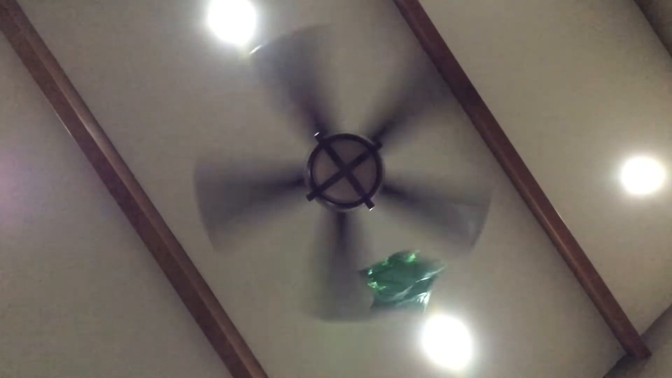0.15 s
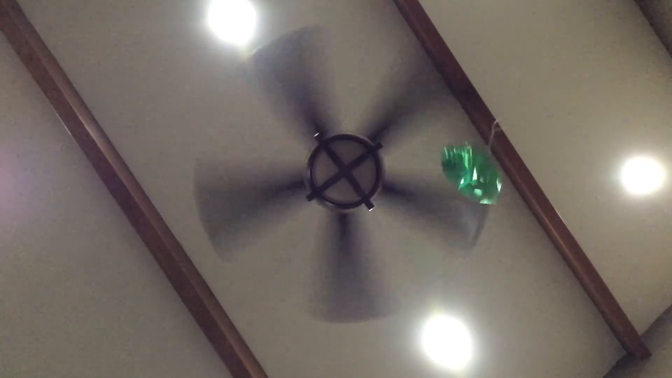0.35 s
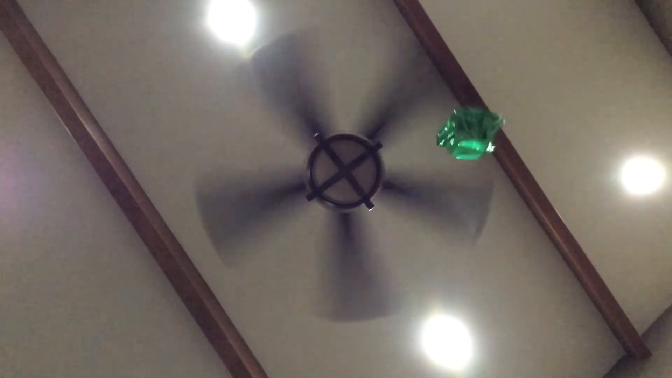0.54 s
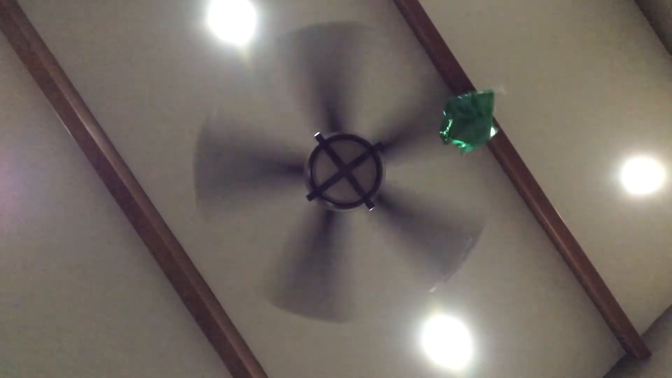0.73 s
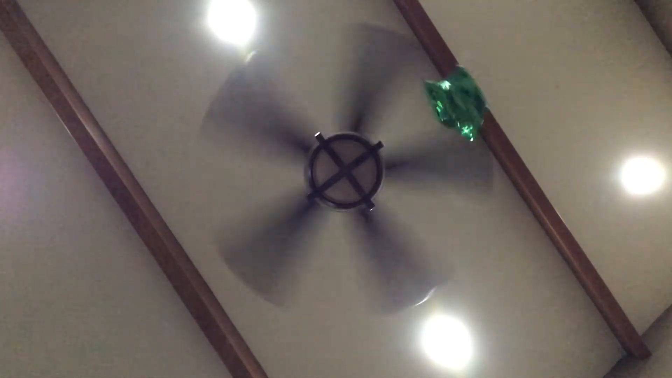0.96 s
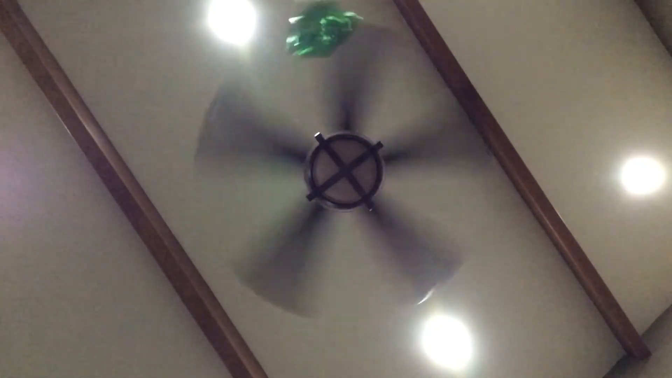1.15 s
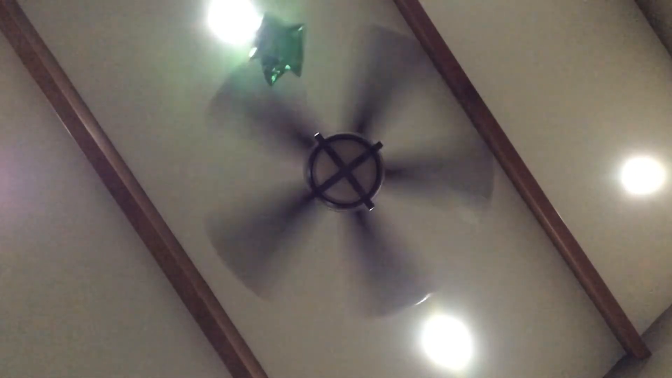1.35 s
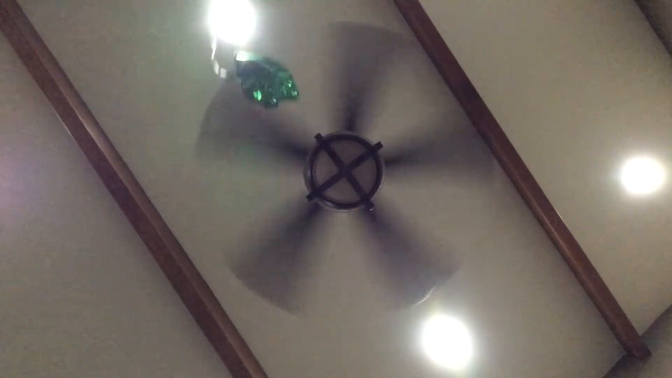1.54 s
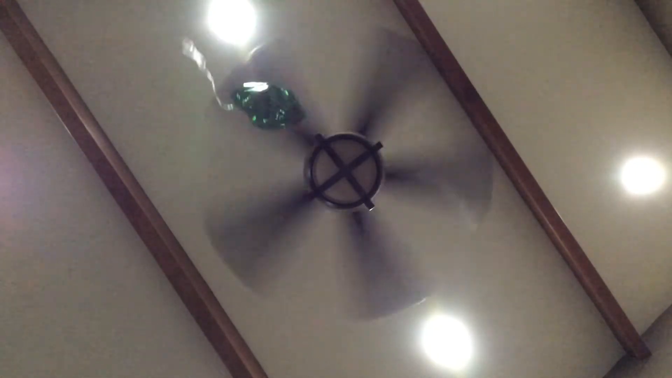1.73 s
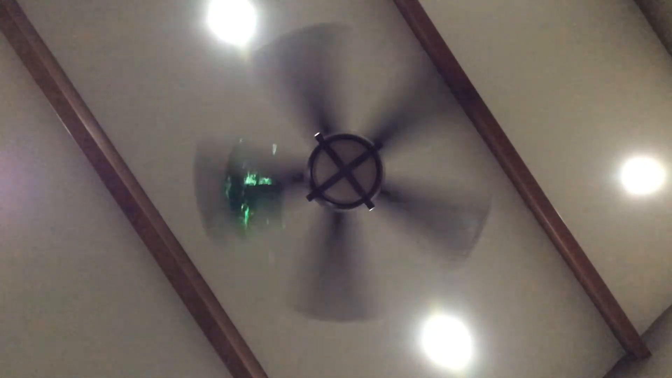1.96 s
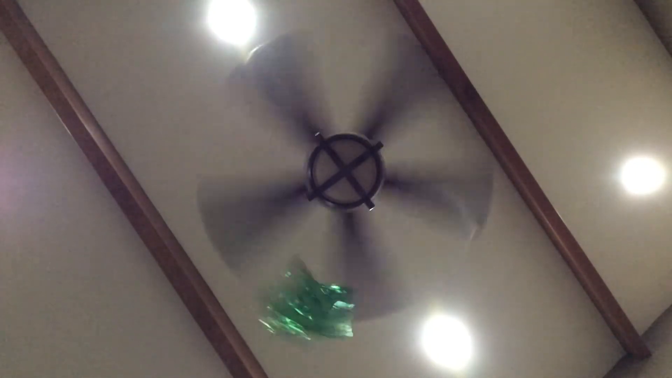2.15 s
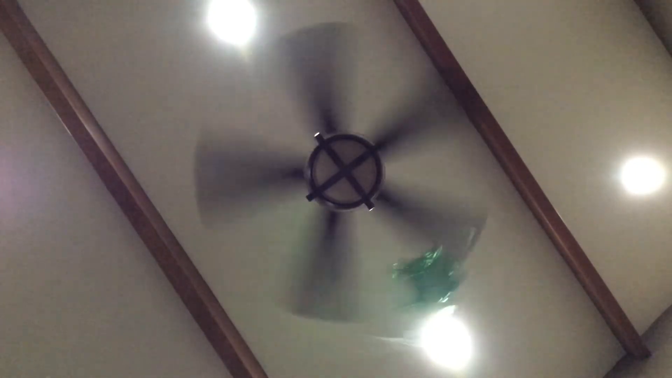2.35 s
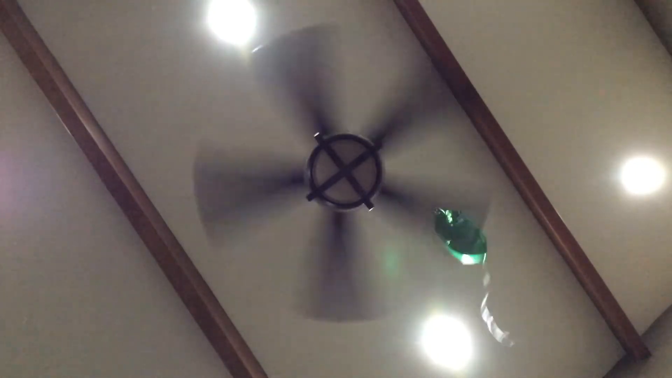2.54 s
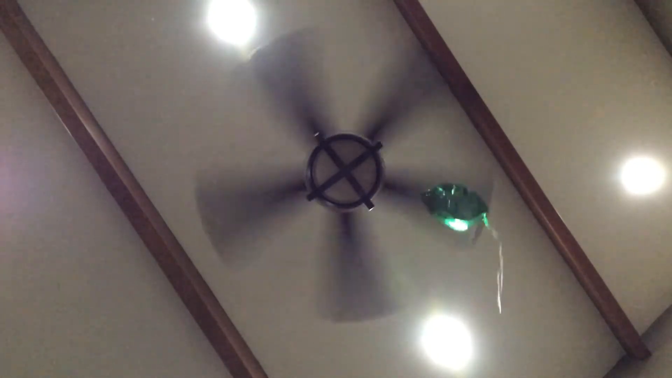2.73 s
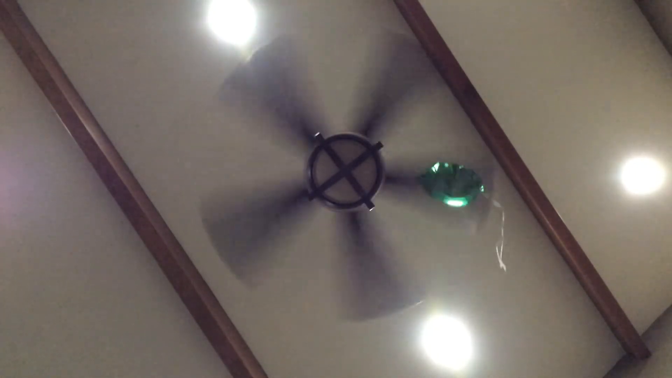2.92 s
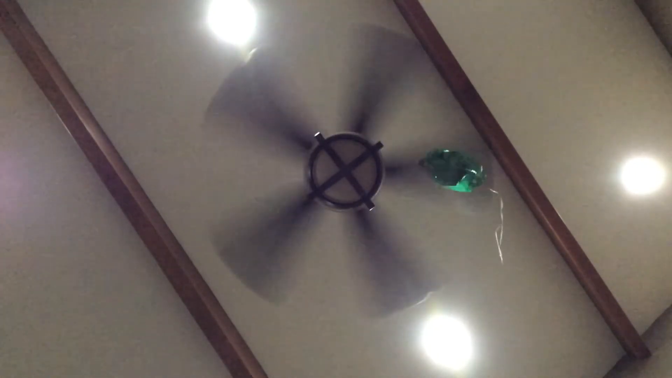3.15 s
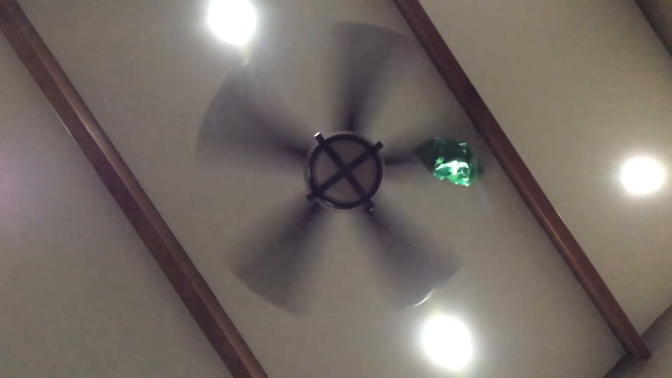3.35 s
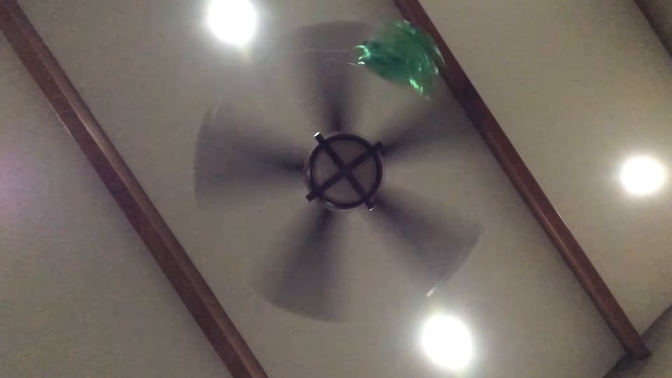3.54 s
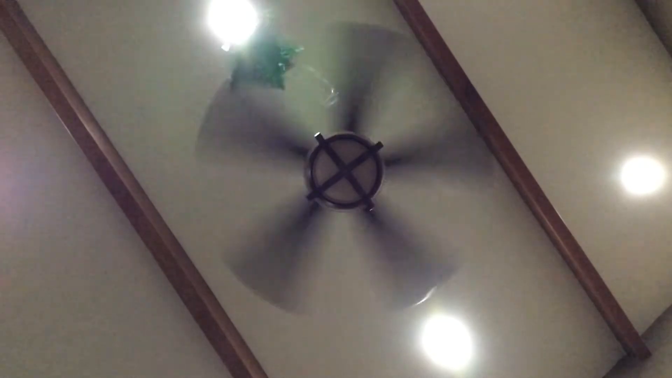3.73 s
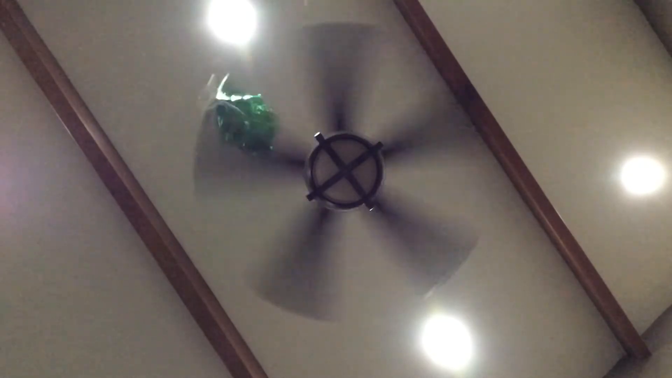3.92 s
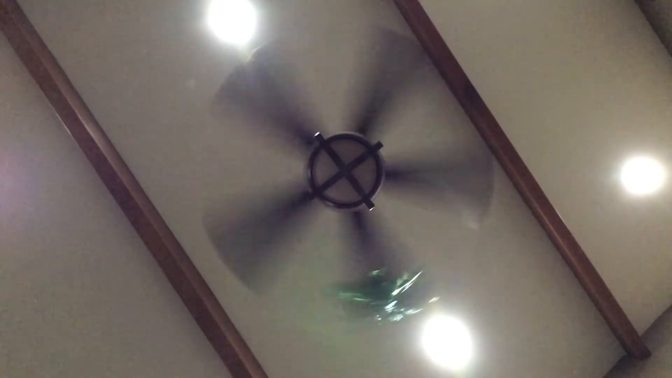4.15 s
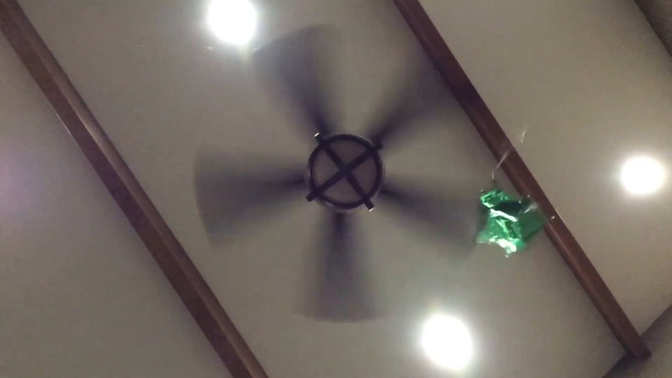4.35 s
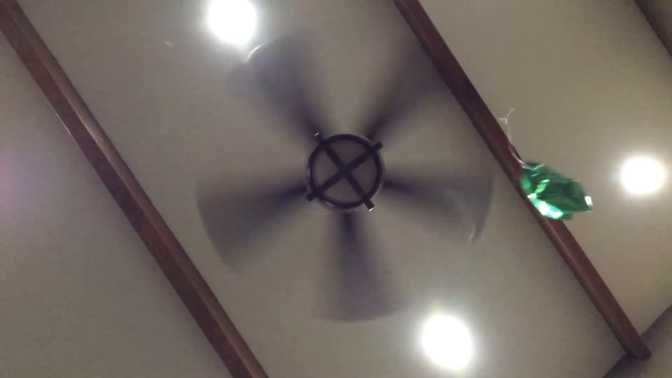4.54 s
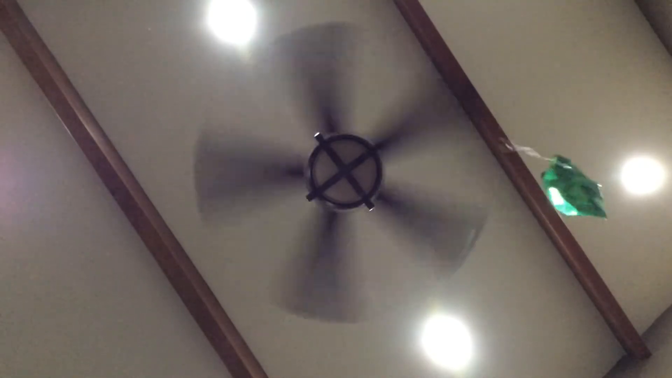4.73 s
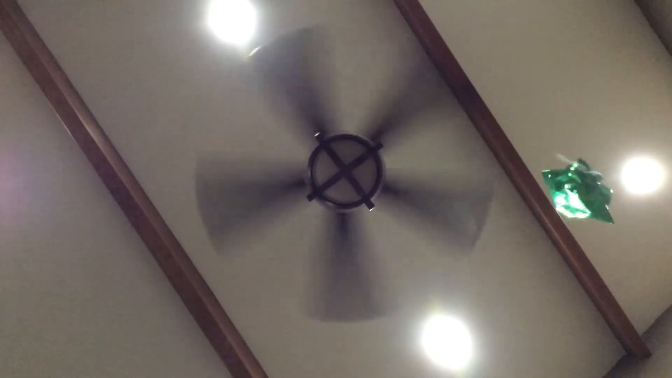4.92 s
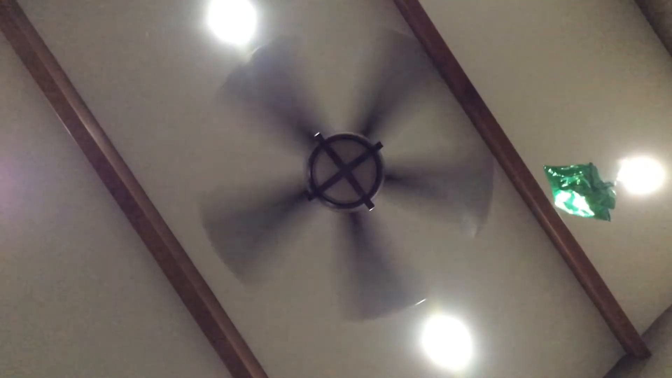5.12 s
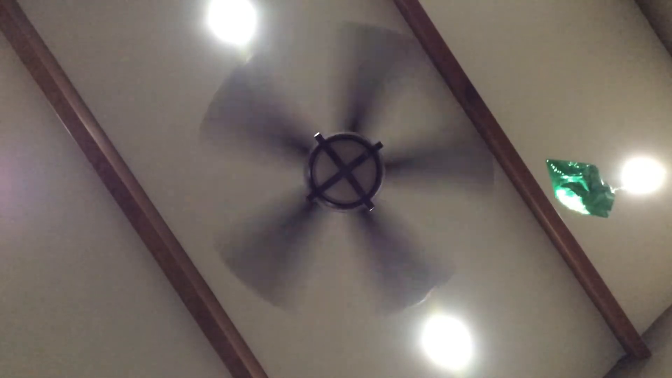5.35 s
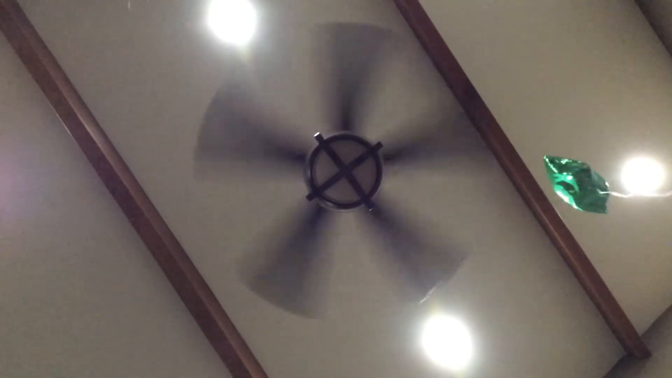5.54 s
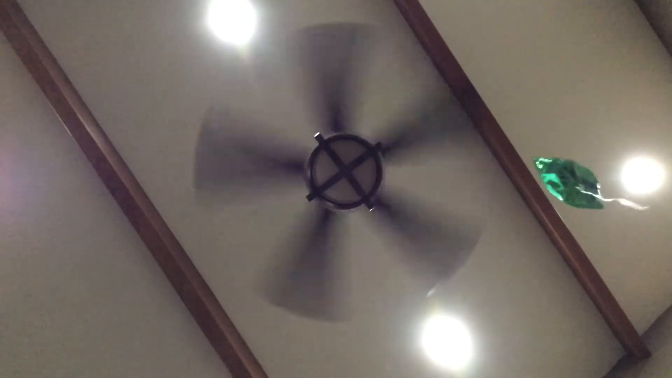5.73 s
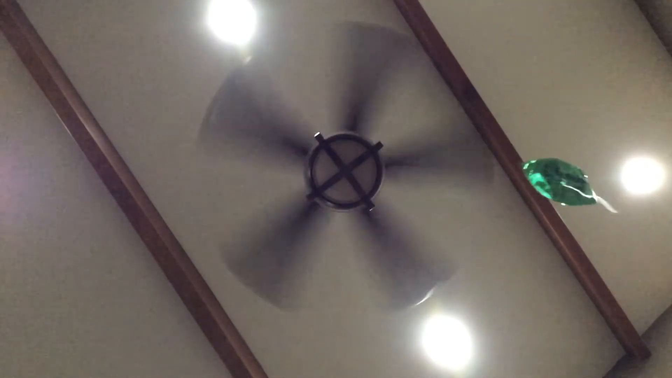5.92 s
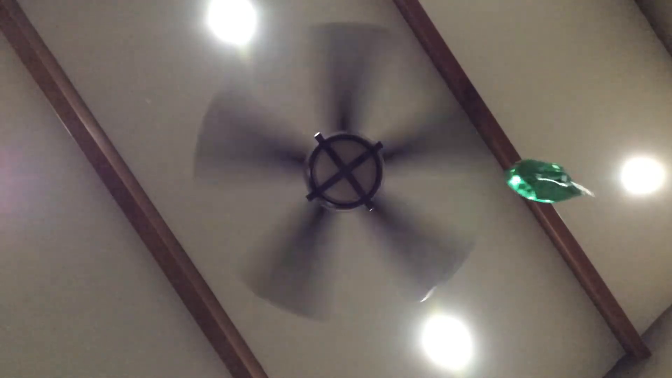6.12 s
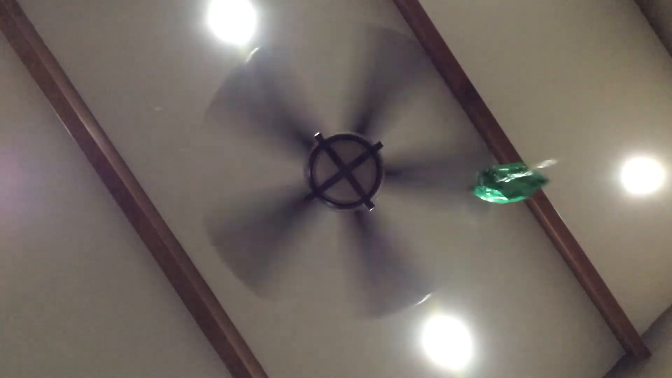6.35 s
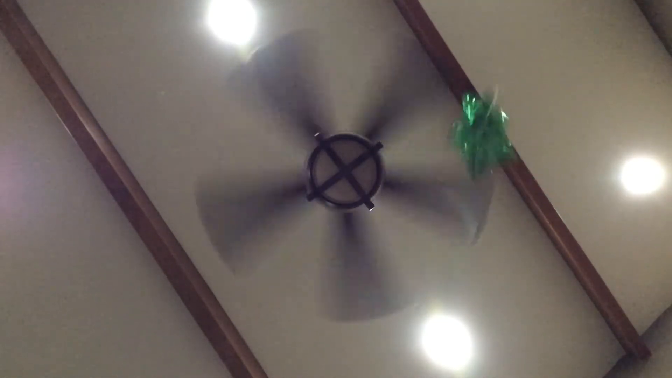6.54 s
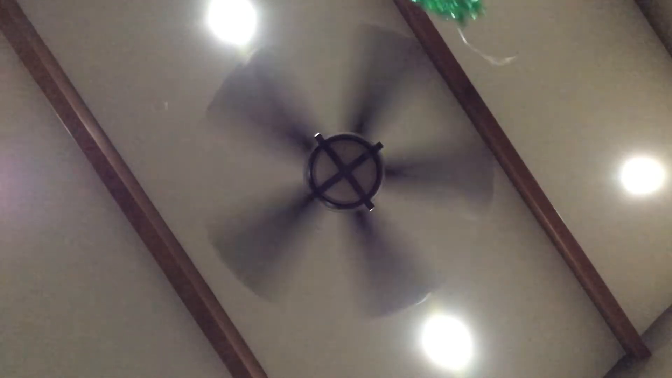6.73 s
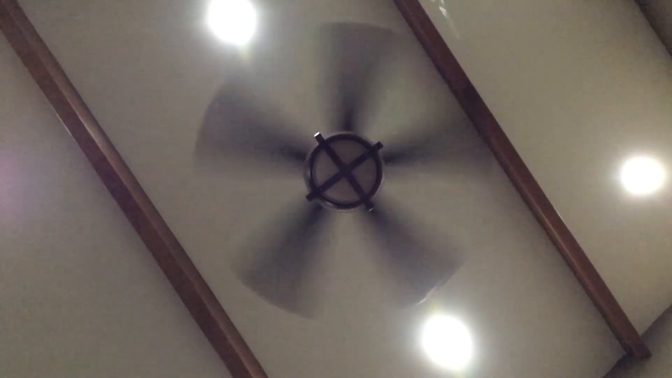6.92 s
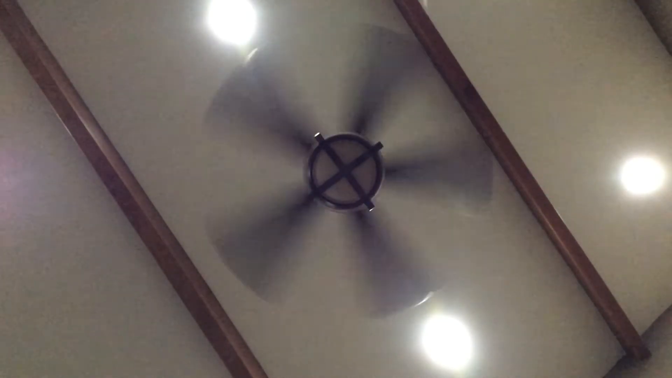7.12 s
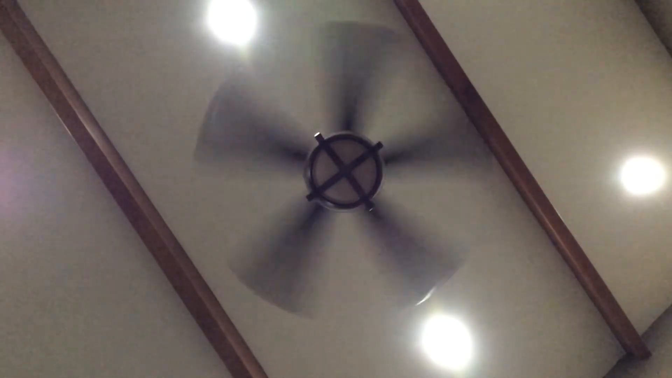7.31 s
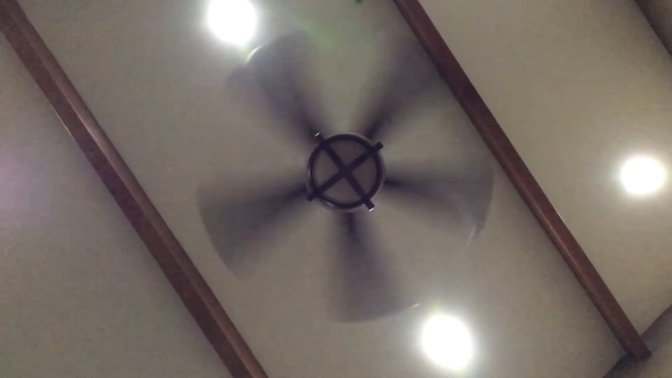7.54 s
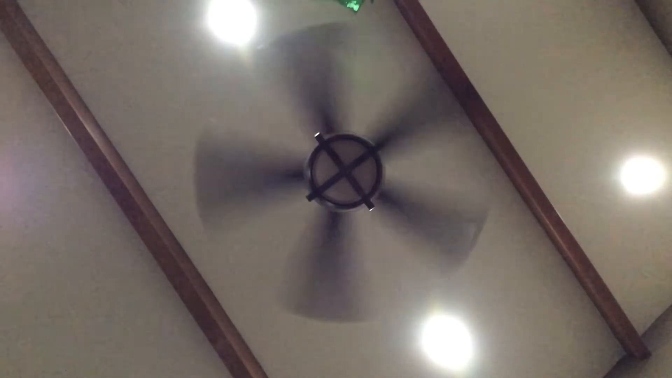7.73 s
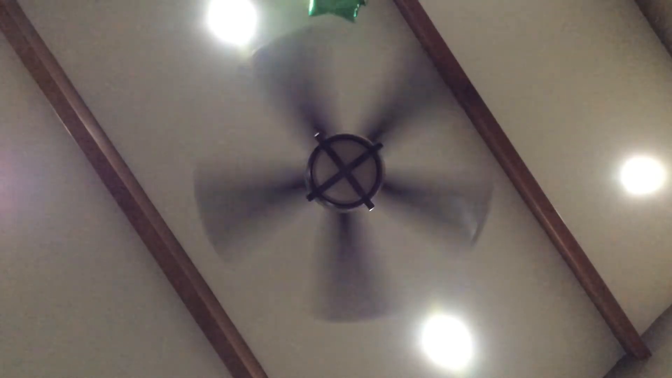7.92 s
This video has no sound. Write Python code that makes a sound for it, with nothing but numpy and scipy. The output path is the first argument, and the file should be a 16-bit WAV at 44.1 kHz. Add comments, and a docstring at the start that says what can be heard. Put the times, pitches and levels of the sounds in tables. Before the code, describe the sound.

Indoors, a ceiling fan makes a quiet, wavering low hum with soft, dull rushing air throughout. A foil balloon is caught by its blades straight away: crisp crinkling swells into a smack at 0.15 seconds, with a lighter one at 0.3. After a lull, a very loud, hollow slap with bright crackle lands at 1.1. Another cluster runs from 1.9 to 2.4, smacking at 2.0, 2.2 and 2.35, the last with a slight low thud. Near silence follows until 3.4, when rattling catches build to a hard, deeper smack at 3.7 and another at 4.07 with a low thud, crinkles trailing off by 4.45. Only hum and the faintest foil rustles remain until 6.3, when crackling returns, with sharp slaps at 6.5 and 6.65. Each hit has a tiny rebound and short room ring. The fan's faint hum continues to about 8 seconds.

```python
"""Foil balloon in a ceiling fan

A foil balloon is caught in a spinning ceiling fan, heard from below in a living room.
Each passing blade crumples the foil: random tiny snaps, shaped into bright crackle and a duller flutter.
A square blow also smacks the taut skin and thumps the gas inside, made from a click and fading tones.
A few hard catches add a low thud, and the room rings after the balloon's sounds.
Underneath, filtered noise makes the fan's throbbing low hum and its rush of air."""
import sys
import numpy as np
from scipy import signal
from scipy.fft import rfft, irfft
from scipy.io import wavfile
from scipy.ndimage import uniform_filter1d

SR = 44100
rng = np.random.default_rng(int(sys.argv[2]) if len(sys.argv) > 2 else 0)


def bounce(signal):
    """Save signal as a 16-bit WAV file at the path given by the first command-line argument."""
    frames = np.transpose(np.atleast_2d(signal))
    limited = np.clip(frames, -1, 1)
    pcm = np.round(limited * 32767).astype(np.int16)
    wavfile.write(sys.argv[1], SR, pcm)


N = 356063

# a blade catches and crumples the foil: t/s, swell/s, fade/s, force level/dB,
# first touch level/dB and skin flutter level/dB, both relative to the force
BLADE_PASSES = [ (0.000, 0.0018, 0.029, -36.5, 2, 5), (0.025, 0.039, 0.024, -31.5, -10.5, -8.5),
                (0.149, 0.011, 0.014, -15.5, -15, -5.5), (0.250, 0.033, .035, -20, -16, -6.5),
                (0.976, 0.025, 0.011, -28, -11, -7), (1.060, 0.02, 0.016, -12.5, -15, -1),
                (1.885, 0.014, 0.022, -23, -18.5, -10.5), (1.976, 0.027, .042, -21, -13.5, -8),
                (2.179, 0.032, 0.03, -21, -3.5, -6.5), (2.328, 0.019, 0.038, -17.5, -9, -6),
                (3.3945, 0.0014, 0.039, -23.5, -13, -5.5), (3.489, 0.026, 0.03, -19, -14.5, -4),
                (3.664, 0.025, 0.011, -13.5, -15.5, 1), (3.850, 0.03, 0.013, -38.5, -12, -4),
                (3.948, 0.0066, 0.061, -25, -9, -7.5), (4.047, 0.028, 0.0074, -12, -22.5, -5),
                (4.110, 0.031, 0.044, -28, -9, -2.5), (4.210, 0.052, 0.048, -32.5, -8, -6),
                (4.300, 0.044, 0.029, -31.5, -12, -6), (4.425, 0.011, 0.0073, -24, -17.5, -8),
                (6.333, .010, 0.012, -33, -7.5, -10.5), (6.416, 0.0037, .016, -21, -15, -6.5),
                (6.505, 0.015, 0.015, -14, -11, -3), (6.618, 0.034, 0.013, -13.5, -16, -4.5), ]
# the foil stirs faintly as the balloon drifts: t/s, force level/dB
FAINT_STIRS = [(0.812, -64), (0.892, -61.5), (1.418, -57.5), (1.457, -59.5), (1.554, -63), (3.275, -60),
               (3.305, -64), (3.330, -62.5), (5.383, -64.5), (5.757, -58), (6.062, -65), (6.998, -59)]
# tone colour of the snapping creases: f/Hz, relative level per Hz/dB
FOIL_COLOUR = [(300, -30), (1500, -16.5), (2600, -8.5), (3600, -7.5), (5000, -8.5), (5800, -3.5),
               (6600, -1.5), (7600, -4.5), (8500, -3.5), (10000, -7.5), (12500, -11), (15800, -22)]
# tone colour of the fluttering skin: f/Hz, relative level per Hz/dB
SKIN_COLOUR = [(40, -32.5), (90, -14), (130, -3.5), (230, -1), (320, 0), (600, -1.5), (1000, -2),
               (1500, -3.5), (2300, -14), (4000, -16), (9000, -35.5)]
# a blade hits the balloon squarely: t/s, smack level/dB, thump level/dB (before a common trim), thump f/Hz
SQUARE_BLOWS = [ (0.1531, -10.5, -18.5, 241), (0.305, -17.5, -26.5, 215), (1.083, -2, 0, 226.6),
                (1.794, -60.5, -33.5, 220), (1.998, -7.5, -16, 192), (2.2, -16, -28.5, 213),
                (2.35, -6.5, -9.5, 210), (2.594, -60, -21, 203), (3.273, -56.5, -26.5, 220),
                (3.397, -19.5, -27.5, 227), (3.513, -19, -21.5, 200), (3.687, -2, -8, 149.9),
                (4.073, -9, -9, 171.6), (6.404, -38, -29.5, 177), (6.511, -7, -18.5, 240.4),
                (6.642, -6, -8.5, 243), ]
# tone colour of a smack: f/Hz, relative level per Hz/dB
SMACK_COLOUR = [(30, -35.5), (60, -20.5), (120, -3), (300, 2.5), (600, 3), (1000, 0.5), (1500, -3.5),
                (2400, -8), (4500, -14), (7000, -12.5), (15000, -32)]
# the taut skin knocks: f/Hz, level/dB relative to the smack, time to fall by 60 dB/s
SKIN_KNOCKS = [(610, -18.5, .039), (1033, -20, 0.044)]
# the gas inside rings: multiple of the thump pitch, relative level/dB, time to fall by 60 dB/s
GAS_RINGS = [(1.001, -1, 0.06), (1.55, -11, .04), (2.25, -11, 0.027)]
# a hard catch jolts the fan: t/s, level/dB before the thud's own rise and fade
FAN_JOLTS = [(2.361, -29.5), (4.064, -24.5), (6.65, -34)]
# the fan's low hum before its throb: t/s, level/dB
HUM_LEVEL = [(0, -48), (.8, -56.5), (2.0, -45), (3.4, -46.5), (4.5, -50), (5.3, -46.5), (6, -54),
             (6.6, -48.5), (7, -58), (8.07, -53)]
# tone colour of the stirred air: f/Hz, relative level per Hz/dB
AIR_COLOUR = [(20, -17), (38, -4), (55, 2.5), (95, 3), (160, -3.5), (240, -5.5), (320, -13), (500, -16),
              (800, -24), (1300, -28.5), (2500, -35), (4500, -37), (7000, -35.5), (11000, -40.5),
              (16000, -51)]
# how long the room rings: f/Hz, time to fall by 60 dB/s
ROOM_RINGING = [(100, 0.54), (260, .41), (900, 0.47), (2000, 0.49), (5000, 0.43), (8000, .35),
                (14000, 0.25)]
# direct sound arrives off the microphone's axis and loses treble: f/Hz, relative level/dB
OFF_AXIS_COLOUR = [(1500, 0), (3000, -1), (5000, -3.5), (6800, 2.5), (9500, -1.5), (12000, -7),
                   (16000, -17)]


def crumples(foil_db=-2.5, patches=5):
    """Creases snap in a dense shower that swells as the blade presses in and fades as it slides off."""
    out, foil_power, skin_power = np.zeros((3, N))
    t = np.arange(SR // 2) / SR
    # every stir shares: swell s, fade s, then first touch and flutter in dB relative to its force
    stirs = [(start, 0.011, 0.012, force_db, -11, -1.5) for start, force_db in FAINT_STIRS]
    for start, swell, fade, force_db, touch_db, flutter_db in BLADE_PASSES + stirs:
        pressing_in = gain_of(touch_db * np.maximum(1 - t / swell, 0))
        sliding_off = np.exp(-np.maximum(t - swell, 0) / fade)
        press = np.where(t < swell, pressing_in, sliding_off)
        # overlapping crumples add as power
        add(foil_power, start, (gain_of(force_db + foil_db) * press) ** 2)
        add(skin_power, start, (gain_of(force_db + flutter_db) * press) ** 2)
    # each patch of foil faces another way, so the room answers it differently
    for _ in range(patches):
        foil_snaps = np.sqrt(foil_power / patches) * snaps(N, per_s=750, spread_db=2.0)
        crackle = signal.oaconvolve(foil_snaps, click(FOIL_COLOUR))
        skin_snaps = np.sqrt(skin_power / patches) * snaps(N, per_s=350, spread_db=2.5)
        flutter = signal.oaconvolve(skin_snaps, click(SKIN_COLOUR))
        out += room(crackle + flutter, direct_db=-3.0)[:N]
    return out


def wander(x, depth_db=2.0, smoothing=(7, 11)):
    """The skin keeps changing shape, so its resonances drift from moment to moment."""
    spectrum = signal.stft(x, SR, nperseg=512, noverlap=384)[2]
    drift = rng.standard_normal(spectrum.shape)
    drift = uniform_filter1d(drift, smoothing[0], 0)  # smooth across pitch
    drift = uniform_filter1d(drift, smoothing[1], 1)  # smooth over time
    gain = evened(gain_of(depth_db * evened(drift)))
    drifted = signal.istft(spectrum * gain, SR, nperseg=512, noverlap=384)[1]
    return drifted[:len(x)]


def slaps(contact_s=0.00073, gas_db=-7.0):
    """A blade's push smacks and knocks the skin and rings the gas; a softer rebound follows."""
    out = np.zeros(N)
    t = np.arange(SR // 6) / SR
    skin = sum(gain_of(db - 60 * t / t60) * np.sin(2 * np.pi * hz * t) for hz, db, t60 in SKIN_KNOCKS)
    smack = click(SMACK_COLOUR)
    add(skin, 0, smack / abs(smack).max())
    # the balloon springs back and meets the same blade again: 22 ms later, softer
    rebounds = [(start + 0.022, smack_db - 9, thump_db - 12.5, hz)
                for start, smack_db, thump_db, hz in SQUARE_BLOWS]
    for start, smack_db, thump_db, hz in SQUARE_BLOWS + rebounds:
        gas = sum(gain_of(db - 60 * t / t60) * np.cos(2 * np.pi * hz * multiple * t)
                  for multiple, db, t60 in GAS_RINGS)
        # a light touch lasts longer than a hard blow and dulls the higher rings
        push_s = contact_s * gain_of(-smack_db / 4)
        push = np.sin(np.pi * np.minimum(t / push_s, 1)) ** 2
        thump = signal.fftconvolve(gas, push / push.sum())[:len(t)]
        blow = gain_of(thump_db + gas_db) * thump + gain_of(smack_db) * skin
        add(out, start, room(blow, direct_db=-1.5))
    return out


def jolts(thud_hz=59.4, rise_s=0.012, t60_s=0.3):
    """A hard catch shakes the fan: a low tone rises quickly and dies away."""
    out = np.zeros(N)
    t = np.arange(SR // 2) / SR
    swell_and_fade = np.minimum(t / rise_s, 1) * gain_of(-60 * t / t60_s)
    thud = swell_and_fade * np.sin(2 * np.pi * thud_hz * t)
    for start, db in FAN_JOLTS:
        add(out, start, gain_of(db) * thud)
    return out


def fan_hum(hum_hz=66, width_hz=9, throb_per_s=1.72, throb_at_s=0.62, throb_db=2, between_db=2):
    """A narrow band of noise wavers like a low hum and throbs, with a lesser swell between main ones."""
    hz, t = np.fft.rfftfreq(N, 1 / SR), np.arange(N) / SR
    hum = noise(1 / (1 + ((hz - hum_hz) / width_hz) ** 4))
    angle = 2 * np.pi * throb_per_s * (t - throb_at_s)
    throb = gain_of(throb_db * np.cos(angle) + between_db * np.cos(2 * angle))
    return curve(HUM_LEVEL) * throb * hum


def fan_air(rush_db=-57.5, eddy_db=1.65, eddy_hz=7):
    """Air stirred by the blades rushes softly; eddies make it rise and fall a little."""
    hz = np.fft.rfftfreq(N, 1 / SR)
    rush = noise(gain_of(read(AIR_COLOUR, hz)))
    eddies = gain_of(eddy_db * noise(1 / (1 + (hz / eddy_hz) ** 2)))
    return gain_of(rush_db) * rush * eddies


def room(x, direct_db, gap_s=0.0053, build_s=0.0082, bounce_s=0.0096, bounce_db=-12, size=32768):
    """Direct sound, a first bounce and a fading tail of reflections, drawn anew for each use."""
    hz, t, spectrum = signal.stft(snaps(size, per_s=6000, spread_db=2.5), SR, nperseg=256)
    # each pitch fades at its own pace
    fade = gain_of(-60 * t / read(ROOM_RINGING, hz)[:, None])
    answer = signal.istft(spectrum * fade, SR, nperseg=256)[1]
    # the tail builds up to full strength at gap_s
    answer *= np.clip((np.arange(len(answer)) / SR - gap_s) / build_s + 1, 0, 1)
    answer /= np.linalg.norm(answer)
    add(answer, bounce_s * rng.uniform(.85, 1.15), [gain_of(bounce_db)])
    add(answer, 0, gain_of(direct_db) * click(OFF_AXIS_COLOUR))
    return signal.fftconvolve(x, answer / np.linalg.norm(answer))


def snaps(count, per_s, spread_db):
    """A random train of snaps of either sign and uneven size, scaled to an rms of one."""
    size = gain_of(spread_db * np.minimum(rng.exponential(1, count), 4))
    sign = np.sign(rng.standard_normal(count))
    happens = rng.random(count) < per_s / SR
    return evened(size * sign * happens)


def click(points, size=4096):
    """A click of unit energy with the given tone colour, its energy packed towards the start."""
    hz = abs(np.fft.fftfreq(size, 1 / SR))
    log_gain = np.log(gain_of(read(points, hz)))
    # the Hilbert transform finds the phase that goes with this loudness curve
    spectrum = np.exp(np.conj(signal.hilbert(log_gain)))
    wave = np.fft.ifft(spectrum).real[:size // 2]
    return wave / np.linalg.norm(wave)


def noise(gain):
    """Random noise with the given gain at each frequency, scaled to an rms of one."""
    return evened(irfft(rfft(rng.standard_normal(N)) * gain, N))


def gain_of(db):
    """Turns decibels into a multiplier for the wave."""
    return 10 ** (np.asarray(db) / 20)


def evened(x):
    """Scales to an rms (a kind of average size) of one."""
    return x / np.sqrt(np.mean(x ** 2) + 1e-20)


def read(points, hz):
    """Reads a table between its points, on a logarithmic frequency axis."""
    f, value = np.transpose(points)
    return np.interp(np.log(hz + 1), np.log(f + 1), value)


def curve(rows):
    """Turns a table of times and decibels into a gain at every sample."""
    return gain_of(np.interp(np.arange(N) / SR, *np.transpose(rows)))


def add(mix, start, sound):
    """Mixes a sound in, starting at the given second."""
    part = mix[max(round(start * SR), 0):][:len(sound)]
    part += sound[:len(part)]


def scene():
    """The balloon's crumples and slaps, the jolts, and the fan, as one channel."""
    return (wander(crumples()) + slaps() + jolts() + fan_hum() + fan_air())[None]


def record(dry, low_cut_hz=42, ceiling=0.88, edge_hz=16050):
    """A small microphone: little deep bass, peaks clipped at a ceiling, and no extreme treble."""
    bass_cut = signal.butter(3, low_cut_hz, "highpass", fs=SR, output="sos")
    heard = signal.sosfilt(bass_cut, dry)
    clipped = np.clip(heard, -ceiling, ceiling)
    treble_cut = signal.firwin(511, edge_hz, window=("kaiser", 8), fs=SR)
    return signal.oaconvolve(clipped, treble_cut[None], "same")


dry = scene()
out = record(dry)
bounce(out)
```